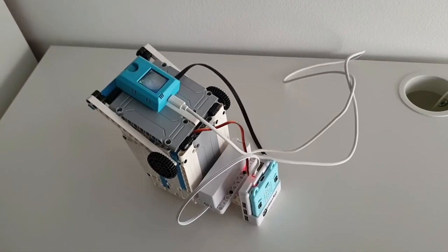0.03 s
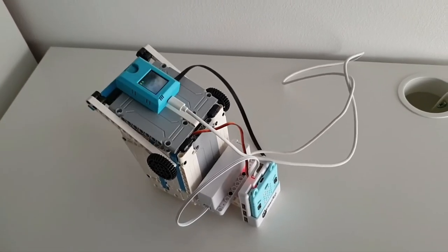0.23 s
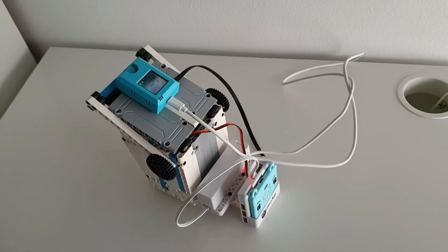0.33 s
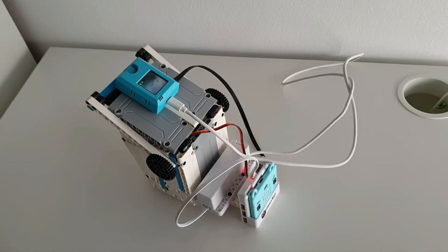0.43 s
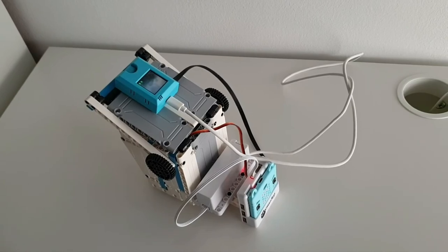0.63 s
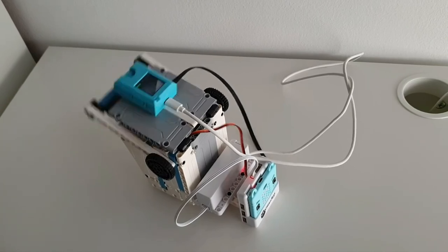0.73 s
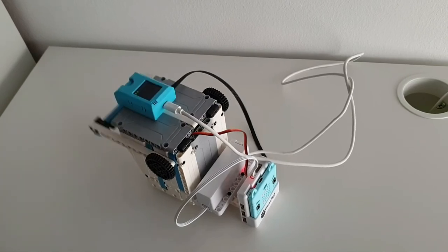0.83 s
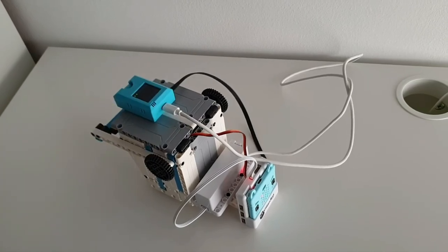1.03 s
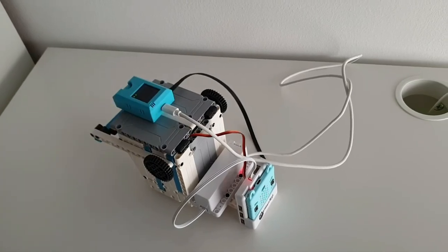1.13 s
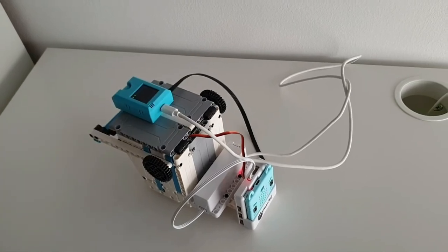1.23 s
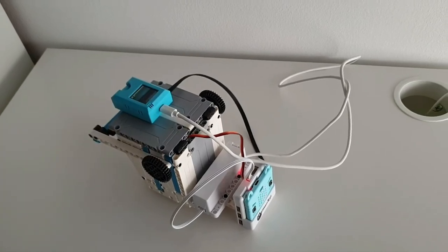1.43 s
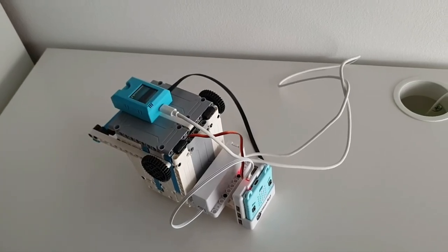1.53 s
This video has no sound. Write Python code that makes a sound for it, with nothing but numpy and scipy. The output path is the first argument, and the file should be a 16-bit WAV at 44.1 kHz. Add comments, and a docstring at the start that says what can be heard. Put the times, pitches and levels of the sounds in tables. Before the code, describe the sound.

Close by in a quiet room, a small motorized robot whirrs and brings its plastic arm down with a sharp clack and a squeaky scrape. It whirrs again, knocks more lightly against the desk and gives one last twitch.

```python
"""A small servo-driven robot on a desk in a quiet room, heard close by.
Its gears whirr, the arm clicks twice and slams down at 0.2 s, then rattles, scrapes and squeaks.
A second move at 0.8 s brings one tap and ends in three knocks, lighter than the slam.
A last twitch follows at 1.4 s. The blows ring the plastic and the desk top; the room answers briefly."""
import sys
import numpy as np
from scipy import signal
from scipy.fft import rfft, irfft
from scipy.io import wavfile
from scipy.ndimage import uniform_filter1d

SR = 44100
rng = np.random.default_rng(int(sys.argv[2]) if len(sys.argv) > 2 else 0)


def transcribe(u):
    """Save the signal u as a 16-bit wav file named by the first command-line argument.

    u: samples, shape (n,) or (channels, n), limited to [-1, 1]; the rate is SR.
    q: integer samples, one column per channel.
    """
    v = np.clip(np.atleast_2d(u).T, -1, 1)
    q = np.round(v * 32767).astype(np.int16)
    wavfile.write(sys.argv[1], SR, q)


N = 70560

# desk top modes: freq_hz, level_db, t60_s
DESK_MODES = [(76, -9, .65), (86, -9, .4), (106, -6, .42), (126, -2, .33), (142, 0, .42), (163, -6, .45)]
# low modes of the robot's box: freq_hz, level_db, t60_s
BOX_MODES = [(246, -27, .25), (287, -14, .22), (320, -27, .22)]
# top treble of ticks and hiss: freq_hz, density_db
TICK_SPECTRUM = [(5000, -26.5), (8300, -16), (9800, -2.5), (11300, 5), (12500, -3), (14500, -4.5),
                 (16000, -20)]
DESK_DB = -27.5
THUMP_RISE_S, FRAME_RISE_S, CONTACT_S = .0085, .0007, .0001


def undb(db):
    return 10 ** (np.asarray(db) / 20)


def per_bin(points):
    """Interpolate (freq_hz, value) over log frequency."""
    hz, value = np.array(points, float).T
    return np.interp(np.log(np.arange(N + 1) * SR / (2 * N) + 1), np.log(hz), value)


def shape(x, gain):
    """Minimum-phase filter, one gain per bin."""
    cepstrum = irfft(np.log(gain + 1e-9))
    cepstrum[1:N] *= 2
    cepstrum[N + 1:] = 0
    return irfft(rfft(x, 2 * N) * np.exp(rfft(cepstrum)))[..., :N]


def colour(x, spectrum):
    """Give white sound a spectrum at equal power."""
    gain = undb(per_bin(spectrum))
    return shape(x, gain / np.sqrt(np.mean(gain ** 2)))


def noise(alike_below_hz=370):
    """Stereo white noise: alike in the bass, unrelated in the treble."""
    hz = np.fft.rfftfreq(N, 1 / SR)
    side_share = .5 * hz ** 2 / (hz ** 2 + alike_below_hz ** 2)
    mid, side = rfft(rng.standard_normal((2, N)))
    return irfft(mid * np.sqrt(1 - side_share) + np.array([[1], [-1]]) * side * np.sqrt(side_share), N)


def wander(rate_hz):
    """Smooth random curve, spread near 1."""
    hold = max(int(SR / rate_hz), 1)
    return 1.3 * uniform_filter1d(rng.standard_normal(N)[np.arange(N) // hold], hold)


def grit(rate_hz, spread_db):
    """Noise broken into tiny contacts of uneven strength."""
    x = noise() * undb(spread_db * wander(rate_hz))
    return x / np.std(x)


def fade(age_s, t60_s):
    return np.exp(-np.log(1000) * age_s / t60_s)


def envelope(t, times_s, levels_db, edge_t60_s=.025):
    """Gain curve that fades outside its span."""
    outside_s = np.maximum(np.maximum(times_s[0] - t, t - times_s[-1]), 0)
    return undb(np.interp(t, times_s, levels_db)) * fade(outside_s, edge_t60_s)


def impulses(table):
    """One impulse train per level column."""
    start_s, *levels_db = np.array(table).T
    trains = np.zeros((len(levels_db), N))
    trains[:, (start_s * SR).astype(int)] = undb(levels_db)
    return trains


def ring(t, blows, modes, rise_s):
    """Blows excite damped modes (freq_hz, level_db, t60_s)."""
    response = -sum(undb(db) * fade(t, t60_s) * np.sin(2 * np.pi * hz * t) for hz, db, t60_s in modes)
    return signal.fftconvolve(blows, response * (1 - np.exp(-t / rise_s)) ** 2)[:N]


def burst(t, blows, spectrum, t60_s):
    """Dense short modes of struck plastic, as decaying noise."""
    decay = fade(t, t60_s) * (1 - np.exp(-t / CONTACT_S))
    return colour(noise() * signal.fftconvolve(blows, decay)[:N], spectrum)


def background(level_db=-67.5):
    """Faint steady noise, mostly bass."""
    # quiet room: freq_hz, density_db
    spectrum = [(30, -3), (72, 11), (110, -6), (300, -11), (500, -16.5), (1500, -27), (2700, -20.5),
                (4000, -31.5), (12000, -34.5)]
    return undb(level_db) * colour(noise(), spectrum)


def room(t, x, rise_s=.012):
    """Short diffuse answer from the desk and near walls."""
    # decay per band: freq_hz, t60_s
    decays = [(150, 0.07), (700, 0.2), (2500, 0.28), (6000, 0.21), (14000, 0.2463)]
    # reflected level: freq_hz, gain_db
    reflection = [(130, -21.5), (300, -13.5), (600, -1), (1500, -2), (4000, -3.5), (11000, -1)]
    band_hz, band_t60_s = np.array(decays).T
    white = rfft(noise())
    log_hz = np.log(np.fft.rfftfreq(N, 1 / SR) + 1)
    tail = 0
    for weights, t60_s in zip(np.eye(len(band_hz)), band_t60_s):
        band = irfft(white * np.interp(log_hz, np.log(band_hz), weights), N)
        tail += band * fade(t, t60_s) * np.sqrt(2 * np.log(1000) / (t60_s * SR))  # unit-energy decay
    tail = shape(tail * (1 - np.exp(-t / rise_s)), undb(per_bin(reflection)))
    return signal.fftconvolve(x, tail, axes=1)[:, :N]


def gear_whirr(t):
    """Gear teeth chatter while the frame shakes the desk."""
    # per servo move: time_s, teeth_db, rumble_db
    moves = [
        [(0, -50, -50), (.02, -52.5, -49.5), (.075, -59, -61.5), (.12, -61, -61), (.2, -78, -59.5)],
        [(.828, -79, -69), (.838, -56, -76), (.856, -65, -56), (.905, -57.5, -58), (.94, -51.5, -51.5),
         (.972, -56, -56), (1.02, -59.5, -54.5)],
        [(1.41, -79.5, -79.5), (1.426, -61.5, -56), (1.447, -55, -60.5), (1.475, -59.5, -61.5),
         (1.6, -88, -81.5)],
    ]
    # tooth chatter: freq_hz, density_db
    teeth_spectrum = [(600, -10), (1200, -11), (2000, -17.5), (4000, -1), (5300, 0), (6600, -1),
                      (7700, -11), (8800, -26.5), (11300, -13.5), (15000, -33.5)]
    # shaken desk: freq_hz, density_db
    rumble_spectrum = [(25, -23.5), (60, -13), (115, -4.5), (150, 3), (200, -16), (245, -6.5), (278, -1),
                       (350, -23.5), (600, -19.5), (1500, -42)]
    teeth = colour(grit(rate_hz=770, spread_db=2), teeth_spectrum)
    rumble = colour(noise(), rumble_spectrum)
    out = 0
    for move in moves:
        times_s, teeth_db, rumble_db = np.array(move).T
        out += teeth * envelope(t, times_s, teeth_db) + rumble * envelope(t, times_s, rumble_db)
    return out


def gear_whine(t, jitter=.0093):
    """Mesh harmonics pass through the housing; the second whine falls under load."""
    # per whine: time_s, mesh_hz, level_db
    whines = [
        [(0, 1276, -52), (.025, 1291, -57.5)],
        [(.903, 1433, -55.5), (.93, 1335, -52), (.953, 1276, -56), (.97, 1175, -60)],
    ]
    # housing resonances: freq_hz, gain_db
    housing = [(2700, -15.5), (3300, -19.5), (4050, 2.5), (4600, -10), (5200, 6.5), (5750, -9.5),
               (8000, -17)]
    housing_hz, housing_db = np.array(housing).T
    out = 0
    for whine in whines:
        times_s, mesh_hz, level_db = np.array(whine).T
        pitch_hz = np.interp(t, times_s, mesh_hz) * (1 + jitter * wander(810))
        phase = 2 * np.pi * np.cumsum(pitch_hz) / SR
        for harmonic in range(2, 7):
            gain_db = np.interp(harmonic * pitch_hz, housing_hz, housing_db) + 3 * wander(200)
            out += undb(gain_db) * envelope(t, times_s, level_db) * np.sin(harmonic * phase)
    return out


def arm_slide(t, waver=.0015):
    """Plastic scrapes along plastic with a thin wavering squeak."""
    # slide after the slam: time_s, scrape_db, hiss_db, squeak_db
    levels = [(.29, -48.5, -50, -87.5), (.32, -41.5, -47, -47.5), (0.359, -53, -50, -44.5),
              (.385, -44.5, -38, -33), (0.411, -46, -39, -38), (0.453, -47, -44, -53),
              (0.473, -57.5, -74, -71), (0.599, -80.5, -103, -93)]
    # squeak partials, plus the small metal part singing along at 8530 Hz: pitch_hz, level_db
    partials = [(10850, 0), (11020, 0), (11380, -7), (8530, -16)]
    # plastic friction: freq_hz, density_db
    scrape_spectrum = [(100, 4.5), (300, 15), (900, -0.5), (1700, 1), (3500, 1), (6500, 7.5), (8200, -3.5),
                       (12000, -20)]
    times_s, scrape_db, hiss_db, squeak_db = np.array(levels).T
    squeak = 0
    for pitch_hz, level_db in partials:
        gain = undb(level_db + 2 * wander(69))
        phase = 2 * np.pi * np.cumsum(pitch_hz * (1 + waver * wander(400))) / SR
        squeak += gain * np.sin(phase)
    scrape = colour(grit(rate_hz=570, spread_db=1.5), scrape_spectrum) * envelope(t, times_s, scrape_db)
    hiss = colour(grit(rate_hz=270, spread_db=7.5), TICK_SPECTRUM) * envelope(t, times_s, hiss_db)
    return scrape + hiss + .5 * squeak * envelope(t, times_s, squeak_db)


def arm_taps(t):
    """The arm taps its stops, ringing desk and box."""
    # lighter blows: start_s, thump_db, boom_db, tap_db
    blows = [(0.8865, -16.5, -26, -16.5), (1.0255, -0.5, -14.5, 2), (1.059, -22, -18, -5),
             (1.085, -17.5, -31, -4), (1.424, -25.5, -47, -52)]
    # arm on stop: freq_hz, density_db
    tap_spectrum = [(300, -22), (450, -14.5), (850, -8.5), (1150, 3.5), (1300, -6.5), (1450, 4),
                    (1800, -11.5), (2300, -2), (3400, -11.5), (4300, -9), (5200, -6.5), (6500, -8.5),
                    (8800, -30), (11000, -19), (15000, -30)]
    thump, boom, tap = impulses(blows)
    return (undb(DESK_DB) * ring(t, thump, DESK_MODES, THUMP_RISE_S)
            + ring(t, boom, BOX_MODES, THUMP_RISE_S)
            + undb(-32) * burst(t, tap, tap_spectrum, t60_s=.063))


def arm_slam(t, frame_db=-27.5, frame_t60_s=.19):
    """The arm clicks twice, slams, rebounds and rattles, ringing desk, box, frame and a metal part."""
    # blows: start_s, thump_db, frame_db, click_db, tick_db
    blows = [(0.0795, -36.5, -48.5, -33.5, -44), (0.0955, -14.5, -36.5, -32, -40.5),
             (0.2139, 3.5, -0.5, 0, -2), (0.2175, -15, -3.5, -15.5, -5), (0.2335, -23, -4, -16, -4.5),
             (0.3035, -21, -45, -23.5, -12.5), (0.399, -11, -43, -28, -8), (0.438, -31, -38, -35.5, -17)]
    # plastic frame modes: freq_hz, level_db
    frame_partials = [(364, 0), (415, -7), (485, -6), (514, -3), (554, 0), (600, 0), (696, -4), (764, -3),
                      (826, 2), (898, -2), (981, -4), (1033, -5), (1118, -3), (1150, -4)]
    # crack of contact: freq_hz, level_db, t60_s
    crack_modes = [(900, -11, .008), (3400, -10.5, 0.01), (4980, -9.5, .006)]
    # small metal part singing on: freq_hz, level_db, t60_s
    metal_modes = [(8530, -61, .7)]
    # midrange clack: freq_hz, density_db
    clack_spectrum = [(40, -31.5), (130, -4), (200, -28), (300, 4.5), (450, 1.5), (560, 0.5), (660, -6),
                      (850, 2.5), (1200, -5), (1700, -9.5), (2200, -18.5), (4000, -38.5)]
    # bright click: freq_hz, density_db
    click_spectrum = [(900, -32.5), (2000, -13.5), (2600, -2), (3400, -1.5), (4200, 0.5), (5300, -0.5),
                      (6400, -8.5), (7400, -10.5), (8300, -31.5), (11000, -49.5)]
    thump, frame, click, tick = impulses(blows)
    frame_modes = [(hz, db + frame_db, frame_t60_s) for hz, db in frame_partials]
    return (undb(DESK_DB) * ring(t, thump, DESK_MODES, THUMP_RISE_S)
            + ring(t, frame, BOX_MODES, FRAME_RISE_S)
            + ring(t, frame, frame_modes, FRAME_RISE_S)
            + ring(t, click, crack_modes, CONTACT_S)
            + ring(t, tick, metal_modes, CONTACT_S)
            + undb(-14) * burst(t, frame, clack_spectrum, t60_s=.076)
            + undb(-12.5) * burst(t, click, click_spectrum, t60_s=.04)
            + undb(-32) * burst(t, tick, TICK_SPECTRUM, t60_s=.056))


def scene():
    """The robot, upper treble leaning right, in the room over a faint background."""
    # stereo balance: freq_hz, left_minus_right_db
    balance = [(380, 1.2), (700, -1.5), (1300, 0), (2400, 4), (4400, -4), (8000, -5), (14000, -0.5)]
    t = np.arange(N) / SR
    robot = arm_slam(t) + arm_taps(t) + gear_whirr(t) + gear_whine(t) + arm_slide(t)
    lean_db = per_bin(balance) / 2
    direct = np.array([shape(robot[0], undb(lean_db)), shape(robot[1], undb(-lean_db))])
    return direct + room(t, .5 * (direct + robot)) + background()


def record(dry):
    """Clip at full scale, then low-pass."""
    cutoff_hz = 14700
    lowpass = signal.ellip(8, .2, 70, cutoff_hz, fs=SR, output="sos")
    return signal.sosfilt(lowpass, np.clip(dry, -1, 1))


dry = scene()
out = record(dry)
transcribe(out)
```